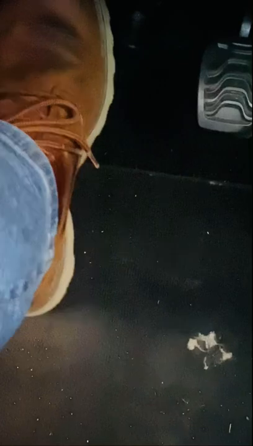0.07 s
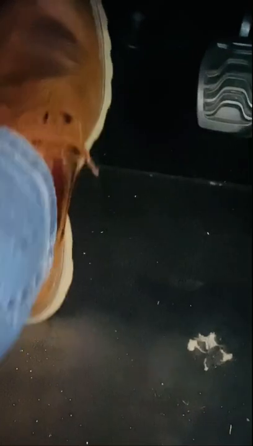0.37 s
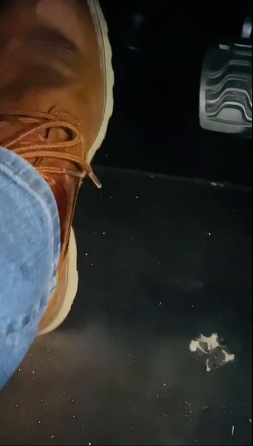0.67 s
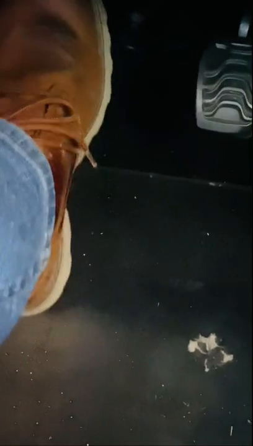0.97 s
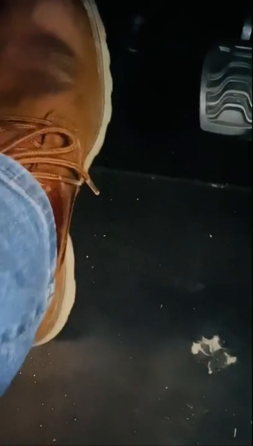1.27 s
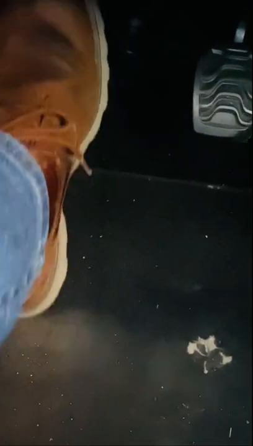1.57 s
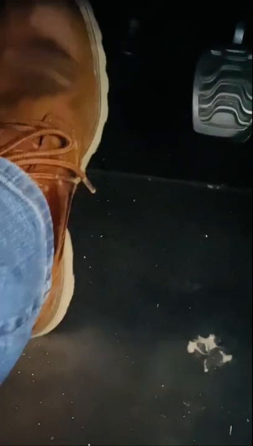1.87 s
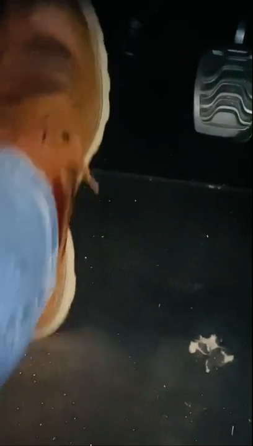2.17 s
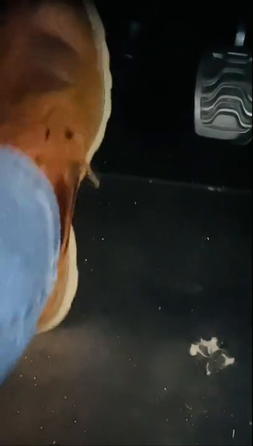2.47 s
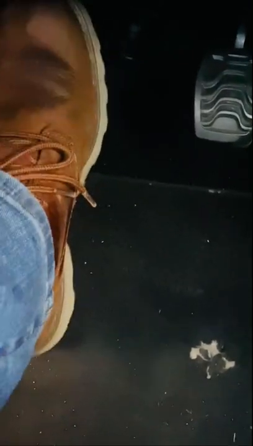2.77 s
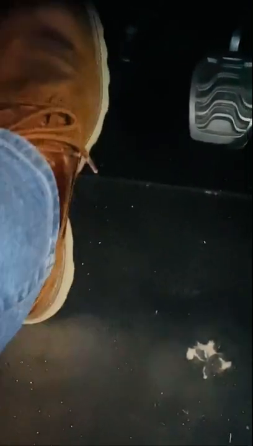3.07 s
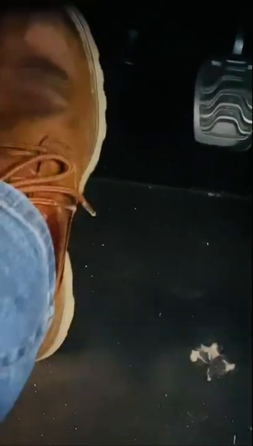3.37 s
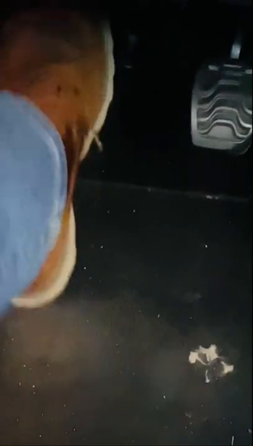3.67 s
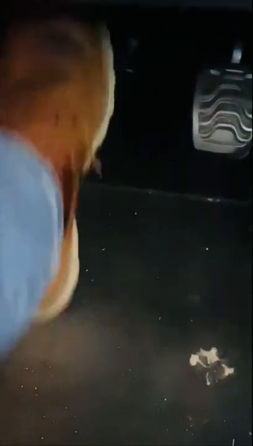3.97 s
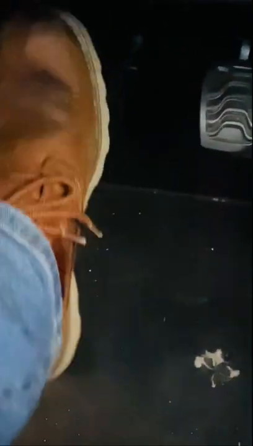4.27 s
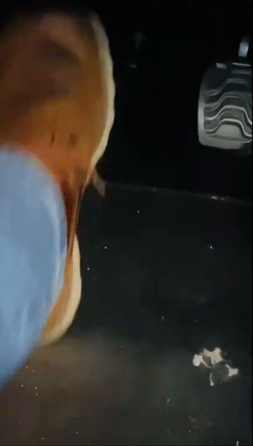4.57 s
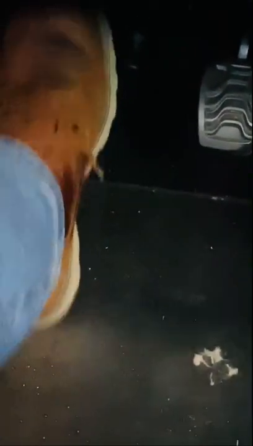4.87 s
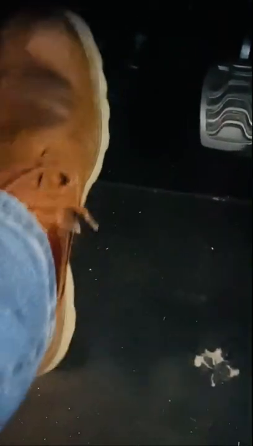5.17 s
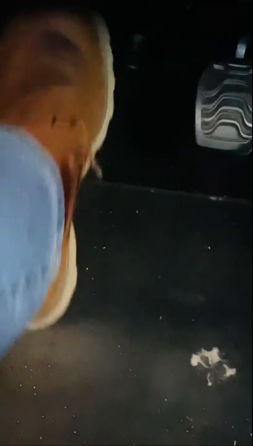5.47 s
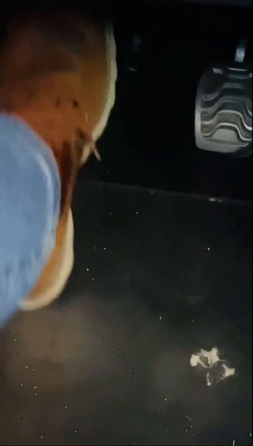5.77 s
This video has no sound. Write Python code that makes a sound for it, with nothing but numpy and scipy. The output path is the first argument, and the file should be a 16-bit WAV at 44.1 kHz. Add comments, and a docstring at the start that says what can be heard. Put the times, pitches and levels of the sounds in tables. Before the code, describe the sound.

A dry car pedal squeaks and creaks repeatedly as a shoe pumps it, with light knocks and a faint low rumble.

```python
"""Dry clutch pedal in a footwell

A shoe pumps the pedal of a car, heard from close by through a phone's two microphone ports.
The pivot sticks and slips: fast slips squeak, slow ones creak through the bracket's resonances.
The linkage knocks at the turns; trousers rustle with each stroke over a low rumble."""
import sys
import numpy as np
from scipy import signal
from scipy.fft import rfft, irfft, next_fast_len
from scipy.io import wavfile

SR = 44100
rng = np.random.default_rng(int(sys.argv[2]) if len(sys.argv) > 2 else 0)


def wav_out(sig):
    """Save sig, one row per channel (or a flat mono array), as 16-bit PCM at SR to the path in sys.argv[1]."""
    wavfile.write(sys.argv[1], SR, np.round(np.clip(np.atleast_2d(sig).T, -1, 1) * 32767).astype(np.int16))


N = 256220
TIME = np.arange(N) / SR
TOP_HZ = 15800  # upper edge of the phone's range

# the many small resonances of the plastic around the pedal: (frequency [Hz], gain [dB])
PLASTIC_SPECTRUM = [(150, -23), (500, -.5), (1500, 2), (2800, 1), (4000, -7), (4700, -18), (5900, -15),
                    (7200, -36), (9000, -14), (12500, -27), (14500, -41), (16000, -50)]


def undb(db):
    """Decibels to gain."""
    return 10 ** (np.asarray(db) / 20)


def unit(x):
    """Scale to rms 1."""
    return x / (np.std(x) + 1e-12)


def gain_at(hz, points):
    """Gain of a (frequency [Hz], level [dB]) spectrum at given frequencies."""
    f, db = np.transpose(points)
    return undb(np.interp(np.log(np.maximum(hz, 1)), np.log(f), db))


def lowpass(f, edge_hz):
    """Response that falls 24 dB an octave above an edge."""
    return 1 / (1 + (f / edge_hz) ** 4)


def resonance(f, hz, width):
    """Response of one damped mode, 1 at its centre."""
    return 1j * f * width / (hz ** 2 - f ** 2 + 1j * f * width)


def filtered(x, response):
    """Pass x through a response given as a function of frequency."""
    size = next_fast_len(len(x) + SR // 8)
    return irfft(rfft(x, size) * response(np.fft.rfftfreq(size, 1 / SR)), size)[:len(x)]


def noise(points, count=N):
    """Noise with a (frequency [Hz], level [dB]) spectrum, rms about 1."""
    white = rng.standard_normal(max(count, SR // 5))
    return unit(filtered(white, lambda f: gain_at(f, points)))[:count]


def wander(count, hz):
    """Random motion mostly slower than hz, rms about 1."""
    white = rng.standard_normal(max(count, SR // 5))
    return unit(filtered(white, lambda f: lowpass(f, hz)))[:count]


def burst(count, t60):
    """Noise that dies by 60 dB in t60 seconds."""
    return rng.standard_normal(count) * np.exp(-np.log(1000) * TIME[:count] / t60)


def add(out, start, x):
    """Mix x into out from a start time on."""
    i = int(start * SR)
    out[i:i + len(x)] += x[:max(N - i, 0)]


def course(length):
    """Time, progress from 0 to 1 and a soft-edged gate for one event."""
    t = np.arange(0, length, 1 / SR)
    return t, t / length, np.clip(np.minimum(t, length - t) / .003, 0, 1)


def sag(t, attack, release):
    """Attack, hold, release: 1 at both ends of an event, 0 while it holds."""
    return np.maximum(1 - t / attack, 0) ** 1.5 + np.maximum(1 - (t[-1] - t) / release, 0) ** 1.2


def glide(progress, first_hz, last_hz, bow_hz):
    """A pitch glide that bows up or down in the middle."""
    return first_hz + (last_hz - first_hz) * progress + 4 * bow_hz * progress * (1 - progress)


def rumble(gain_db=1, apart_db=-21, swell_db=2.75):
    """The cabin's low rumble swells unevenly, nearly alike at both ports."""
    # colour of the rumble: (frequency [Hz], relative level [dB])
    spectrum = [(20, -22.5), (35, -14), (47, -1.5), (56, 7), (68, -1), (90, -6), (115, -13), (150, -11),
                (230, -25), (380, -23.5), (600, -28.5), (1000, -50.5), (3000, -56.5), (6000, -77)]
    # its slow rise and fall: (time [s], relative level [dB])
    levels = [(.25, -44), (.56, -51.5), (1.4, -50), (2.25, -48.5), (2.75, -52), (3.45, -44.5), (4.8, -48),
              (5.8, -47)]
    pair = noise(spectrum) + undb(apart_db) * np.array([noise(spectrum), noise(spectrum)])
    return pair * undb(np.interp(TIME, *np.transpose(levels)) + gain_db + swell_db * wander(N, 9))


def rustle(gain_db=5, rest_db=-77):
    """Denim and sole rub softly near the microphone, swelling and fading with the leg's speed."""
    # colour of rubbing cloth: (frequency [Hz], relative level [dB])
    cloth = [(200, 2.5), (500, 9), (800, 4.5), (1500, -2.5), (2800, -3.5), (4000, -3.5), (7000, -12),
             (12000, -11), (14500, -20.5), (16000, -27)]
    # leg strokes: (middle [s], half length [s], relative level [dB])
    strokes = [(0.264, .06, -61.5), (0.471, 0.093, -61), (.76, 0.064, -59), (1.02, 0.08, -60.5),
               (1.289, 0.14, -60.5), (1.579, .08, -57.5), (1.98, 0.11, -64.5), (2.302, .08, -59),
               (2.635, 0.11, -62), (2.99, 0.098, -58.5), (3.328, .1, -60), (3.693, 0.13, -52.5),
               (4.144, 0.17, -52), (4.446, 0.25, -65), (4.688, 0.14, -55), (5.086, 0.26, -59.5),
               (5.578, 0.17, -54)]
    power = sum((undb(db) * np.exp(-((TIME - middle) / half) ** 2)) ** 2 for middle, half, db in strokes)
    envelope = np.sqrt(undb(rest_db) ** 2 + power)
    return noise(cloth) * envelope * undb(gain_db + wander(N, 40))


def bracket(kicks, plastic_db, radiating_hz=5200):
    """Kicks ring the bracket's main modes and a haze of short plastic resonances."""
    # modes of the pedal bracket: (frequency [Hz], width [Hz], gain [dB])
    modes = [(317, 32, 5.5), (538, 100, 6), (666, 79, 7), (899.6, 350, 0), (1145, 120, 3.5),
             (1245, 25, 9.5), (1387, 180, -1), (1562, 26, 3.5), (1932, 15, -1.5), (2270, 280, -2),
             (2714, 55, 7), (2850, 150, -1.5), (3460, 55, 4.5), (3610, 150, -14), (3923, 90, -10),
             (5430, 960, -13.5)]

    def response(f):
        # neighbouring modes swing in opposite directions
        swings = ((-1) ** k * undb(db) * resonance(f, hz, wide) for k, (hz, wide, db) in enumerate(modes))
        return sum(swings) * lowpass(f, radiating_hz)
    haze = burst(SR // 16, t60=.028)
    ringing = signal.fftconvolve(kicks, haze / np.linalg.norm(haze))[:len(kicks)]
    plastic = filtered(ringing, lambda f: gain_at(f, PLASTIC_SPECTRUM))
    return filtered(kicks, response) + undb(plastic_db) * plastic


def creaks(scatter=.57, spread_db=11, depth_db=23.5):
    """The pivot binds and comes free: its uneven slips slow and speed up, each kicking the bracket."""
    # binds: (start [s], length [s], free slip rate [Hz], slowest rate [Hz], delay until slowest [s],
    #   half width of the slowdown [s], attack [s], release [s], level [dB], unevenness [0-1])
    binds = [ (0.12, .060, 1378, 544.3, .014, .022, 0.0067, .034, -18.5, 0.2),
             (4.167, .094, 1098, 317.6, .044, .025, 0.011, .030, -21.5, .32),
             (5.068, 0.099, 1033, 312.6, .047, .035, .011, .030, -19.5, .2)]
    out = np.zeros(N)
    for start, length, free_hz, slowest_hz, delay, width, attack, release, db, uneven in binds:
        t, _, gate = course(length)
        binding = np.exp(-np.abs((t - delay) / width) ** 3)
        hz = free_hz * (slowest_hz / free_hz) ** binding
        slips, i = np.zeros(len(t)), 0
        for late, size in rng.standard_normal((SR // 100, 2)):
            if i >= len(t):
                break
            slips[i] = undb(spread_db * uneven * size) / np.sqrt(hz[i])
            i += 1 + int(SR / hz[i] * np.exp(scatter * uneven * late))
        strength = undb(db - depth_db * sag(t, attack, release)) * gate
        sound = bracket(np.pad(slips * strength, (0, SR // 10)), plastic_db=-7.5)
        add(out, start, sound * np.sqrt(np.sum(strength ** 2) / np.sum(sound ** 2)))
    return out


def slip_tone(hz, second_db, upper_db, rough, jitter=.083, waver=.002, shimmer=.44, flutter_hz=330):
    """Fast regular slips make a harmonic stack; a rough grip shakes its pitch and strength and scrapes."""
    # fall-off of the third and higher harmonics: (frequency [Hz], relative level [dB])
    overtones = [(2900, 16), (4200, -0.5), (5200, -5), (6400, -13), (7400, -25), (8500, -12), (9700, -12.5),
                 (11500, -17.5), (14500, -28), (16000, -36)]
    count = len(hz)
    shake = jitter * rough * wander(count, flutter_hz) + waver * wander(count, 120)
    phase = 2 * np.pi * np.cumsum(hz * (1 + shake)) / SR
    orders = np.arange(1, 16)[:, None]
    upper = gain_at(orders[2:] * hz, overtones) * (orders[2:] * hz < TOP_HZ)
    # a gentler slip is rounder, so its overtones fall off faster
    db_per_octave = .2 * np.minimum(upper_db + 10, 0)
    upper *= undb(db_per_octave * np.log2(orders[2:]))
    upper *= undb(upper_db) / np.linalg.norm(upper, axis=0)
    sizes = np.vstack([np.ones(count), undb(second_db), upper])
    # each harmonic shakes with the grip and a little on its own
    own = np.array([wander(count, flutter_hz) for _ in orders])
    sizes *= 1 + shimmer * rough * (wander(count, flutter_hz) + .38 * own)
    stack = np.sum(sizes * np.sin(orders * phase + rng.uniform(0, 2 * np.pi, orders.shape)), axis=0)
    scrape = undb(-7) * rough * noise(PLASTIC_SPECTRUM, count)
    return np.sqrt(2) * stack + scrape


def squeaks(depth_db=31.5, grip_hz=55, grip_db=.8, colour_db=1.4, catch_rough=.35, catch_s=.012):
    """The pivot catches roughly, jumps to a new slip rate and glides on; overtones mostly die first."""
    # slides of the pivot: (start [s], length [s], pitch at the catch [Hz], delay until the jump [s],
    #   jump time [s], pitch after it [Hz], last pitch [Hz], bow of the glide [Hz], attack [s],
    #   release [s], level [dB], swell [dB], second harmonic [dB re fundamental],
    #   higher ones [dB re fundamental], fade of both by the end [dB], roughness [0-1])
    slides = [ (0.142, 0.023, 603.4, 0.0049, .004, 667.4, 730, 0.5, 0.0049, .009, -19, -1, -10.5, -15, -7, 0),
              (0.148, 0.091, 1290, .018, 0.0028, 1464, 1376, 13, 0.016, 0.047, -18, -0.5, 3, -11, 24.5, 0.08),
              (.617, 0.032, 686, 0.0046, .005, 687, 790, 4, 0.01, 0.023, -36, 5, -21, -28, -2, 0),
              (0.636, 0.069, 1010, 0.027, .008, 1126, 1150, -1.5, 0.015, .030, -21, 12, -1, -1, 69, 0.11),
              (0.671, 0.08, 1279, 0.0085, .004, 1327, 1210, 29, 0.012, 0.027, -24.5, -3.5, -9.5, -18.5, -3, .12),
              (1.174, .085, 1352, 0.032, 0.0057, 1458, 1502, 53, .021, 0.038, -14, 13.5, 0, -10.5, 38.5, 0.03),
              (1.796, 0.1, 1300, 0.0045, 0.0067, 1284, 1215, 23.5, 0.022, 0.041, -19, 5.5, -0.5, -12.5, 26, 0),
              (1.871, 0.064, 1000, 0.012, 0.0046, 951, 953.5, 11.5, 0.0068, 0.044, -29, 5, 2.5, 3.5, 19, 0.05),
              (1.863, 0.11, 736, 0.013, .006, 775, 690, -17, .008, 0.033, -47.5, -2, -21, -23, 10, 0.4),
              (2.495, .100, 1327, 0.041, .004, 1369, 1230, -11, 0.027, 0.022, -20, -2.5, 1, -8, 22.5, 0.03),
              (2.575, 0.051, 1097, .008, 0.0067, 1028, 1003, 0, 0.017, 0.029, -38, 8.5, -25, -27, 3, 0),
              (3.179, 0.11, 1346, 0.039, .005, 1453, 1493, 0, 0.026, 0.041, -17, 6, 2.5, -10.5, 20.5, 0.01),
              (3.956, 0.1, 1711, 0.015, 0.0029, 1775, 1863, 3, 0.0079, 0.012, -32.5, 3, 6, -8, 60, 0),
              (4.075, 0.05, 1646, 0.0075, .006, 1597, 1612, -9, 0.023, 0.027, -30, 7, -36, -24, 10, 0.03),
              (4.229, 0.095, 987, 0.016, .006, 1152, 1153, 2, 0.024, 0.09, -20, 2, -3, -18.5, 68, 0.15),
              (4.882, 0.14, 1285, 0.021, .012, 1557, 1546, 61, 0.021, 0.019, -17.5, 9, 0, -5.5, 21.5, 0.01),
              (5.031, 0.049, 2085, .012, .008, 1940, 1890, -2, 0.021, .018, -51.5, -2, -33, -35, 3, .08),
              (5.148, 0.024, 594.3, 0.0044, 0.0036, 661, 834, -6, 0.0054, 0.015, -21, -16, -8, -9.5, 0, 0),
              (5.158, 0.13, 1044, 0.0206, 0.015, 1090, 1050, 23, 0.014, 0.047, -29, -6, -1, -17, 15, 0.03),
              (5.77, 0.076, 1478, 0.022, .007, 1592, 1635, 10, 0.016, 0.027, -24.5, -2.5, -4, -11, -11, 0.01)]
    out = np.zeros(N)
    for (start, length, catch_hz, delay, jump, first_hz, last_hz, bow_hz,
         attack, release, db, swell_db, second_db, upper_db, fade_db, rough) in slides:
        t, progress, gate = course(length)
        sliding_hz = glide(np.clip((t - delay) / (length - delay), 0, 1), first_hz, last_hz, bow_hz)
        jumped = .5 * (1 + np.tanh((t - delay) / jump))
        hz = catch_hz + (sliding_hz - catch_hz) * jumped
        level = db + swell_db * (progress - .5) - depth_db * sag(t, attack, release)
        fade = fade_db * progress ** 3.2
        # the varying grip moves the level and the overtones' strength
        level += grip_db * wander(len(t), grip_hz)
        second = second_db - fade + colour_db * wander(len(t), grip_hz)
        upper = upper_db - fade + colour_db * wander(len(t), grip_hz)
        roughness = rough + catch_rough * np.exp(-t / catch_s)
        add(out, start, slip_tone(hz, second, upper, roughness) * undb(level) * gate)
    return out


def thud(centre_hz, cycles, octaves=.44, boom_db=-1, boom_hz=95, panel_db=-14, panel_hz=220):
    """A blow crosses the floor panel as a bending wave: highs arrive first, so it chirps down."""
    def response(f):
        bump = lambda hz: np.exp(-.5 * (np.log2((f + 1) / hz) / octaves) ** 2)
        body = bump(centre_hz) + undb(boom_db) * bump(boom_hz) + undb(panel_db) * bump(panel_hz)
        return body * np.exp(-2j * np.pi * cycles * np.log(f + 35))
    wave = filtered(signal.unit_impulse(SR // 8), response)
    return wave / np.max(np.abs(wave))


def tick(top_hz):
    """Loose parts chatter for a moment against the bracket; a softer contact is duller."""
    chatter = burst(SR // 8, t60=.022)
    wave = filtered(bracket(chatter, plastic_db=3), lambda f: lowpass(f, top_hz))
    return wave / np.max(np.abs(wave))


def knocks():
    """The linkage knocks as the pedal turns round: a thud in the floor and a tick at the bracket."""
    # blows: (time [s], thud peak [dB], thud centre [Hz], chirp length [cycles per e-fold of pitch],
    #   tick peak [dB], tick's upper edge [Hz])
    blows = [(.286, -34.5, 250, 4.6, -17, 11600), (0.807, -36.5, 241.7, 7.1, -26.5, 2346),
             (1.33, -61.5, 300.8, 2.4, -32, 15000), (1.746, -32, 245.4, 0.97, -51.5, 1014),
             (2.232, -60, 298, 1.7, -48, 11000), (2.904, -53.5, 298, 2.2, -46, 10300),
             (3.153, -40.5, 147, 4.5, -48, 894), (3.397, -33.5, 403, 3.5, -36, 1240),
             (3.728, -9, 484, 2.8, -37, 2510), (3.788, -20.5, 403, 2.6, -34, 2230),
             (3.874, -28.5, 288, 2, -49.5, 2030), (4.953, -19.5, 402.5, 1.9, -64, 1500),
             (5.677, -16.5, 408.4, 2.6, -46.5, 2200)]
    out = np.zeros(N)
    for start, thud_db, centre_hz, cycles, tick_db, top_hz in blows:
        add(out, start, undb(thud_db) * thud(centre_hz, cycles) + undb(tick_db) * tick(top_hz))
    return out


def whines():
    """Faint tones swell, glide and fade in the background, alike at both ports."""
    # tones: (start [s], length [s], first pitch [Hz], last pitch [Hz], bow of the glide [Hz], level [dB])
    tones = [(1.25, 0.54, 412, 319.5, -9, -61.5), (1.68, 0.7, 480, 399, -54, -59),
             (3.34, 0.287, 538, 540, -32, -57.5)]
    out = np.zeros(N)
    for start, length, first_hz, last_hz, bow_hz, db in tones:
        _, progress, _ = course(length)
        phase = 2 * np.pi * np.cumsum(glide(progress, first_hz, last_hz, bow_hz)) / SR
        swell = np.sqrt(np.sin(np.pi * progress))
        add(out, start, swell * undb(db) * np.sqrt(2) * np.sin(phase))
    return out


def footwell(x, early_db=-16, cabin_db=-35):
    """Dense, short reflections from the trim and a weak cabin tail, different at each port."""
    count = SR // 4
    out = []
    for _ in range(2):
        early = burst(count, t60=.1) * (TIME[:count] > .001)
        late = burst(count, t60=.12)
        echo = undb(early_db) * early / np.linalg.norm(early)
        echo += undb(cabin_db) * late / np.linalg.norm(late)
        out.append(signal.fftconvolve(x, echo)[:N])
    return np.array(out)


def ports(x):
    """Near sounds reach the two microphone ports with a phase and level that depend on frequency."""
    # bias to the left, of which each port takes a share: (frequency [Hz], phase lead [rad], level [dB])
    bias = [(0, 0, 0), (200, -.5, 1), (310, -.7, 2), (430, -2.7, 2), (690, -1.9, 1), (920, -1.7, .5),
            (1400, .3, 1), (1900, .6, 0), (2500, 1.2, 1), (4000, .9, 1), (5400, .5, 1.5), (7200, 3.1, 0),
            (16000, 13.1, 0)]
    # notches where a trim reflection cancels at the left port: (frequency [Hz], width [Hz], depth [dB])
    left_dips = [(1090, 110, -5), (1265, 110, -12), (2260, 220, -9), (2850, 260, -13), (3250, 180, -10),
                 (4400, 240, -13)]
    # the same at the right port: (frequency [Hz], width [Hz], depth [dB])
    right_dips = [(2470, 70, -6), (2700, 70, -5), (3570, 130, -6), (4200, 130, -5)]
    bias_hz, lead, tilt_db = np.transpose(bias)

    def path(f, dips, share):
        gain = undb(share * np.interp(f, bias_hz, tilt_db))
        phase = share * np.interp(f, bias_hz, lead)
        notches = [1 - (1 - undb(db)) * resonance(f, hz, width) for hz, width, db in dips]
        return gain * np.exp(1j * phase) * np.prod(notches, axis=0)
    left = filtered(x[0], lambda f: path(f, left_dips, share=.5))
    right = filtered(x[1], lambda f: path(f, right_dips, share=-.39))
    return np.array([left, right])


def scene():
    """Pedal and cloth close to the phone in the footwell, with rumble and faint tones behind."""
    near = squeaks() + creaks() + knocks() + rustle()
    return ports(near + footwell(near)) + rumble() + whines()


def record(dry):
    """The phone's microphone opens after a short silence; the top of the treble is cut."""
    opening = np.clip((TIME - .056) / .015, 0, 1)
    return signal.sosfilt(signal.ellip(8, .2, 70, TOP_HZ, fs=SR, output="sos"), dry * opening)


dry = scene()
out = record(dry)
wav_out(out)
```